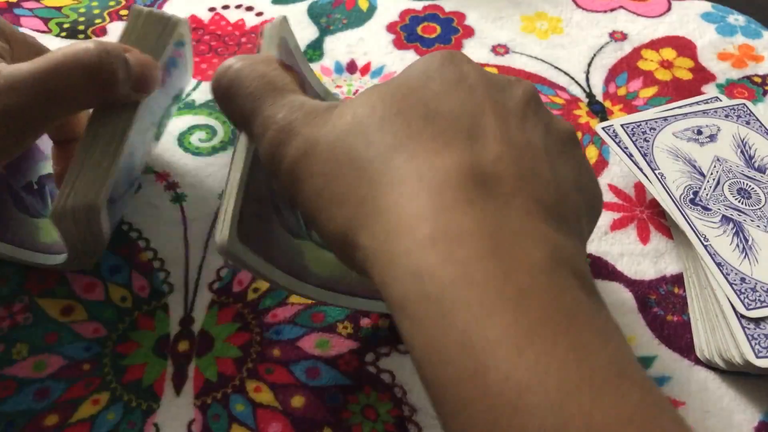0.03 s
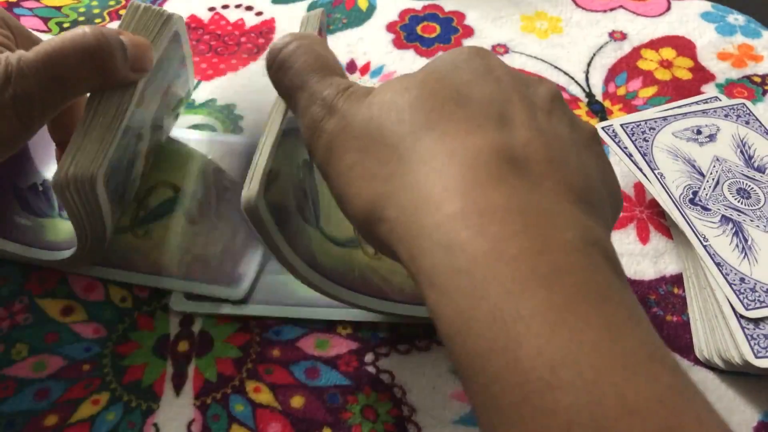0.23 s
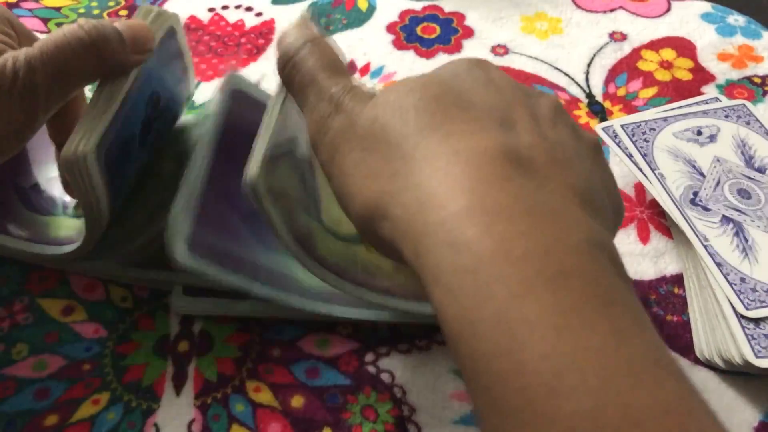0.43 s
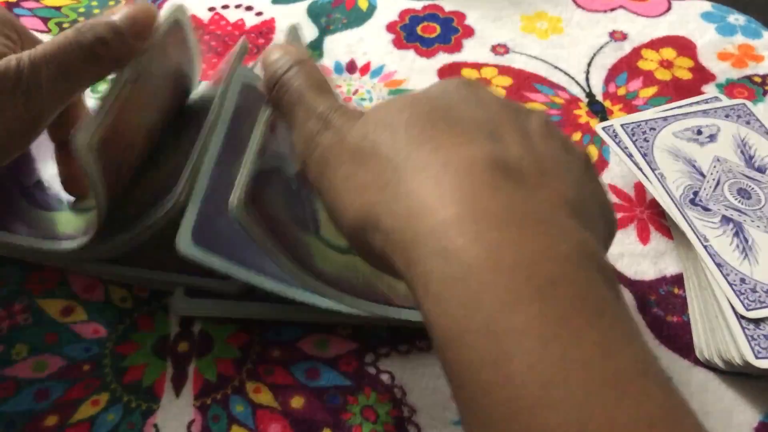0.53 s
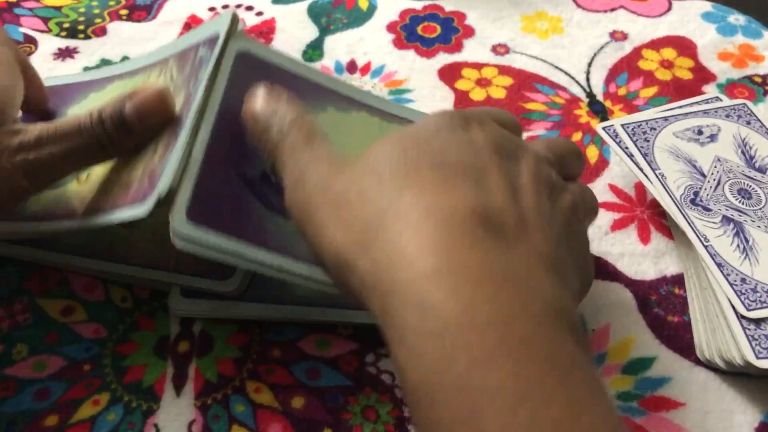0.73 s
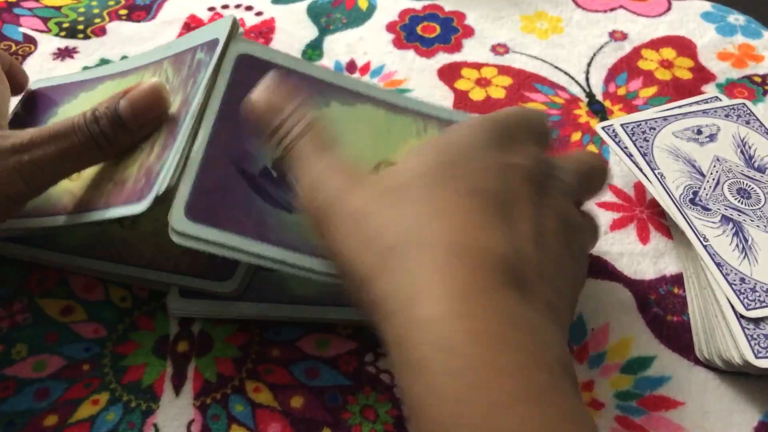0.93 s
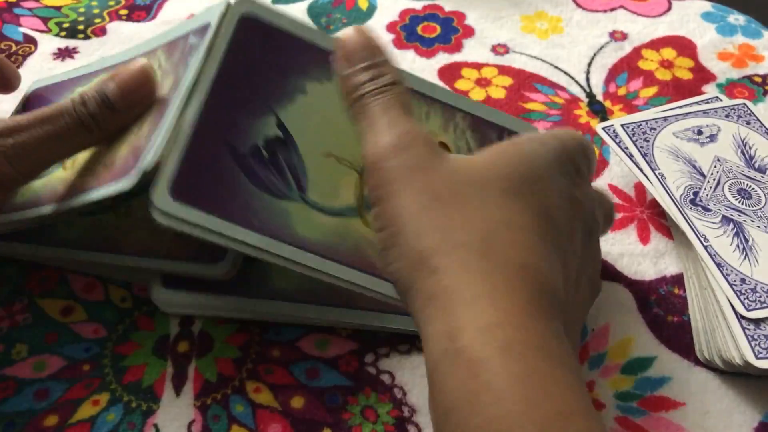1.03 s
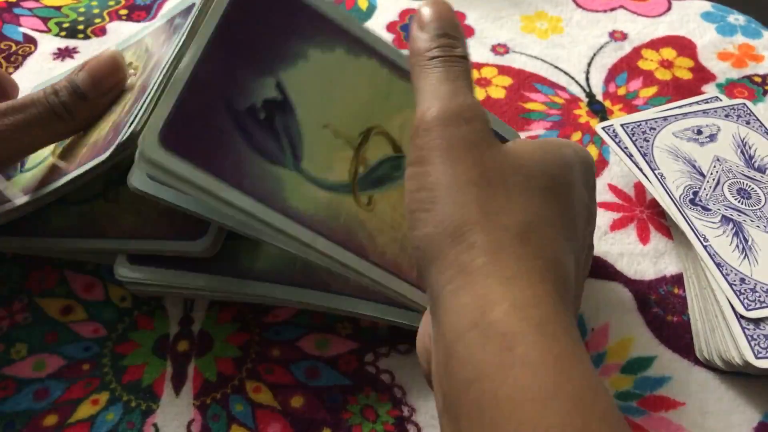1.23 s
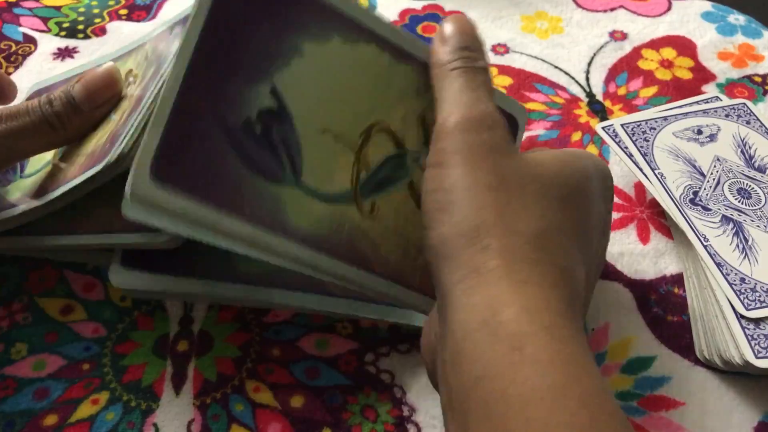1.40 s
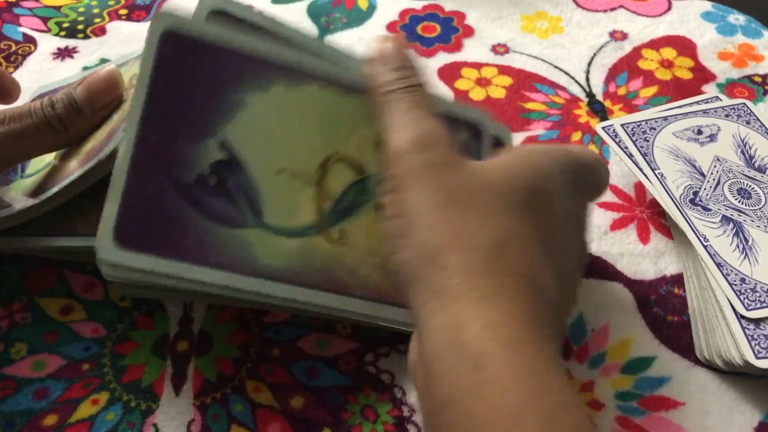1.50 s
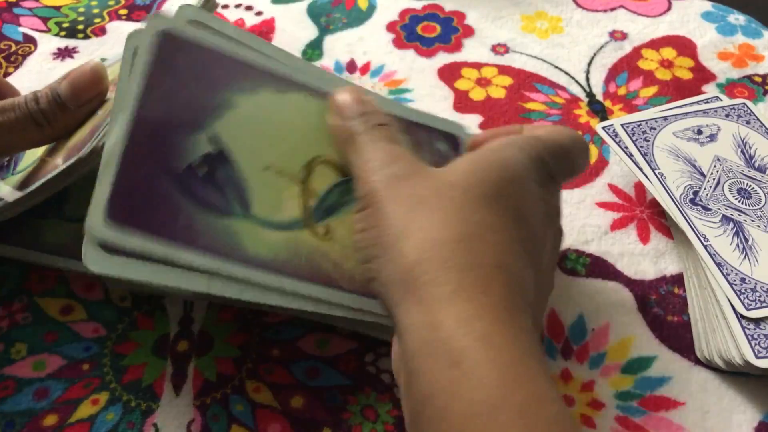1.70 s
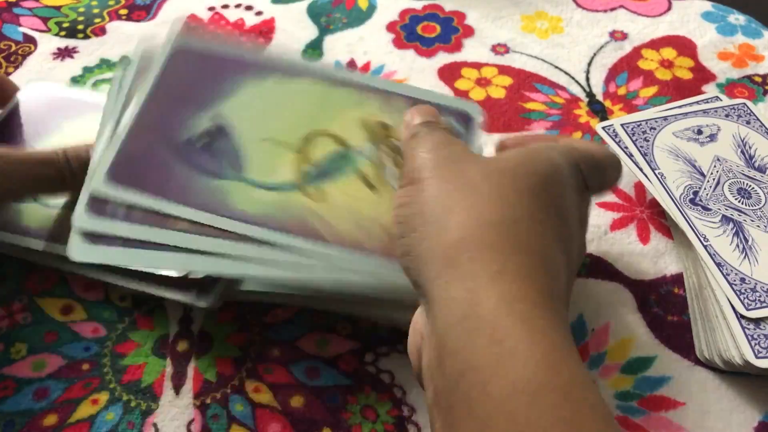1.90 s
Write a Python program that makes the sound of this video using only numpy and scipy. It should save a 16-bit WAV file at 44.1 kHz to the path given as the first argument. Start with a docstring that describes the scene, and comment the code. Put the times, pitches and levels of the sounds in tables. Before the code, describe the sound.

A deck of large, stiff cards is riffled close to the microphone. From about 0.15 to 0.7 seconds, papery flicks crowd together, with hard, bright claps near 0.2, 0.4, 0.54 and 0.63 and soft thuds on cloth. Then faint sliding hiss and tiny knocks around 1.05-1.2, a clearer tap at 1.47, a lighter one at 1.7, and small corner snaps at 1.88-1.94. Small room, low hum.

```python
"""Cards flick and clap through one riffle, then the halves slide together with a soft hiss and light knocks.
The deck is large and stiff, on a cloth-covered table, close to the microphone in a small room with a low hum.
Flicks are noise bursts; claps are chirps of squeezed-out air that set bent cards ringing.
Thumps, knocks and corner snaps are damped modes; rubbing is dense random slips shaped by level and spectrum.
"""
import sys
import numpy as np
from scipy import signal
from scipy.fft import rfft, irfft
from scipy.io import wavfile
from scipy.ndimage import uniform_filter1d

SR = 44100
rng = np.random.default_rng(int(sys.argv[2]) if len(sys.argv) > 2 else 0)


def bounce(signal):
    """Save signal as a 16-bit WAV file at the path given by the first command-line argument."""
    frames = np.transpose(np.atleast_2d(signal))
    limited = np.clip(frames, -1, 1)
    pcm = np.round(limited * 32767).astype(np.int16)
    wavfile.write(sys.argv[1], SR, pcm)


N = 85995

# Room air spectrum. Each row: frequency in Hz, relative level in dB.
AIR_COLOUR = [(25, -14), (45, 1.5), (190, -11.5), (650, -24.5), (1100, -15.5), (2000, -23), (3500, -22.5),
              (7000, -33)]
AIR_DB = -59.5
# Hum tones. Each row: frequency in Hz, rms level in dB.
HUM_TONES = [(134, -66.5), (240, -68.5)]

# Card faces rubbing during the riffle. Each row: time in seconds, level in dB.
RIFFLE_LEVEL = [(.14, -77.5), (.18, -57), (.22, -50.5), (.26, -51), (.32, -61), (.37, -40.5), (.445, -32.5),
                (.49, -48), (.56, -41.5), (.655, -27.5), (.69, -41), (.73, -44.5), (.8, -80)]
# Spectrum of that rubbing. Each row: frequency in Hz, relative level in dB.
RIFFLE_COLOUR = [(40, 4), (130, 7.5), (350, 0.5), (1100, -2.5), (3300, -9), (5500, -12.5), (15000, -21)]
# The halves sliding together. Each row: time in seconds, level in dB.
SLIDE_LEVEL = [(.75, -58.5), (.93, -65.5), (1.035, -55.5), (1.115, -62), (1.16, -54), (1.23, -66),
               (1.425, -102), (1.44, -56), (1.52, -74.5), (1.7, -75), (1.82, -64), (1.92, -80), (1.95, -60)]
# Spectrum of the slide. Each row: frequency in Hz, relative level in dB.
SLIDE_COLOUR = [(450, -8.5), (1100, -3.5), (3400, -6.5), (5000, -10), (10500, -14), (15000, -17.5)]
SLIPS_PER_S, RIFFLE_SPREAD_DB, SLIDE_SPREAD_DB = 7000, 2.6, 2.3

# Single cards flicking free and patting the pile; the row at 1.437 s is a brief scrape as the halves slide.
# Each row: start in seconds, thud level in dB, crack level in dB, edge tick level in dB.
FLICKS = [(0.1453,-40,-47.5,-51.5), (.166,-42,-53,-45), (0.172,-33.5,-38,-43.5), (0.1827,-35.5,-36,-38),
          (.188,-23.5,-31.5,-33.5), (0.2044,-20,-16,-33), (.234,-30,-37.5,-45), (.264,-44,-39.5,-34),
          (0.271,-38.5,-31.5,-41), (0.2798,-22.5,-34.5,-36.5), (.2879,-29,-32.5,-35),
          (0.3337,-36,-45.5,-47.5), (0.3586,-32.5,-41,-37.5), (0.3697,-30,-32.5,-36.5),
          (.3956,-27,-34.5,-41), (0.405,-38.5,-28,-36.5), (0.4133,-34.5,-13,-31), (.429,-34,-21,-38),
          (0.4517,-27.5,-30,-30.5), (0.506,-36,-40.5,-34.5), (.522,-22,-19,-36), (0.5328,-34.5,-21.5,-33.5),
          (0.5368,-23.5,-15,-38.5), (0.5467,-23,-18,-37.5), (0.571,-27,-26.5,-32.5), (0.5793,-24,-20,-32.5),
          (.588,-27,-24.5,-35), (0.5984,-36,-27,-35.5), (0.6211,-39.5,-19.5,-26.5), (.6239,-17.5,-13.5,-26),
          (0.6257,-31,-17.5,-26.5), (0.6465,-21,-22,-27), (.655,-27,-25,-29), (.662,-36,-19,-28),
          (.672,-42,-29.5,-31.5), (0.6813,-32,-36,-35.5), (1.437,-76,-50.5,-68), (1.696,-40.5,-62,-66)]
# Thud, crack and edge tick. Each row: low edge in Hz, high edge in Hz, decay time constant in seconds.
FLICK_PARTS = [(110, 895, 0.0049), (869, 3760, 0.0024), (4350, 13700, 0.00095)]
FLICK_RISE_S = 0.00023

# Packets landing on the cloth. Each row: start in seconds, level in dB.
THUMPS = [(0.202, -28), (0.281, -29), (0.546, -34), (0.658, -33.5), (1.145, -51.5)]
# Modes of the padded table. Each row: frequency in Hz, relative level in dB, t60 in seconds.
TABLE_MODES = [(63, 0, .1), (141, -.5, .13)]

# Edges knocking against the stack.
# Each row: start in seconds, ring level in dB, tilt in dB per octave, edge tick level in dB.
KNOCKS = [(0.8703, -50, -4, -54), (1.0443, -40, 10, -51.5), (1.096, -37, 13, -54), (1.168, -41.5, 1, -63),
          (1.1845, -34, 3.5, -48.5), (1.4744, -22.5, 3.5, -40), (1.6927, -35, 3.5, -48)]
# Modes of the stack. Each row: frequency in Hz, relative level in dB before tilt, t60 in seconds.
STACK_MODES = [(910, -2, .017), (1300, -1, .014), (2040, -5, .019), (3200, -1, .0055)]
# Corners of single cards snapping free.
# Each row: start in seconds, ring level in dB, tilt in dB per octave, edge tick level in dB.
SNAPS = [(0.2038, -8, 3.5, -42), (1.745, -41, 5.5, -52.5), (1.8760, -29.5, 5.5, -48),
         (1.8818, -29, 1.5, -41.5), (1.9362, -21, 4.5, -37.5)]
# Modes of one bent card. Each row: frequency in Hz, relative level in dB before tilt, t60 in seconds.
CARD_MODES = [(1450, 0, .015), (2050, -8, .008), (3050, -6, .0045), (4200, 0, .007), (5420, -5, .006)]
KNOCK_RISE_S, KNOCK_SCATTER_DB = .0008, -16

# Clumps clapping shut, most rising in pitch as the air pocket closes; the late row at 0.70 s is a single card
# corner snapping free. Each row: start in seconds, length in seconds, start pitch in Hz, end pitch in Hz, level
# in dB.
CLAPS = [(.2040, .0050, 640, 1000, -11), (.4150, .0037, 1300, 4700, -2.5), (.4169, .0052, 3300, 3320, -6.5),
         (.5342, .0026, 1200, 2400, -3), (.5364, .0020, 2900, 3700, -6.5), (.5400, .0054, 1750, 2450, -10),
         (.6266, .0014, 1600, 4400, -5), (.640, .024, 290, 190, -29), (.7010, .0015, 2700, 4700, -19.5)]
CLAP_GRIT_GAIN, CLAP_PEAK_FRACTION = .15, .6
# Bent cards ringing after a clap. Each row: frequency in Hz, relative level in dB, t60 in seconds.
RING_MODES = [(2540, -20, .22), (3270, -21, .17)]
# Reach: how far from a clap's pitch modes answer. Fade: the thinning deck rings less.
RING_DB, RING_REACH_OCT, RING_FADE_DB_PER_S = 6.5, 0.68, 42

# Room tail. Each row: frequency in Hz, t60 in seconds, level in dB.
ROOM = [(99, 0.3, -16.5), (2400, 0.27, -13.5), (5800, 0.3, -20.5), (13900, 0.23, -13)]
ROOM_DELAY_S = .004

CEILING = .96
BAND_EDGE_HZ = 15900


def amp(db):
    """Decibels to gain."""
    return 10 ** (np.asarray(db) / 20)


def unit(x):
    """Scales to rms 1."""
    return x / np.sqrt(np.mean(x ** 2) + 1e-20)


def add(mix, start_s, sound):
    """Mixes a sound in at start_s, cut at the end of the mix."""
    part = mix[round(start_s * SR):][:len(sound)]
    part += sound[:len(part)]


def read(points, hz):
    """Interpolates a table along log frequency."""
    points_hz, value = np.transpose(points)
    return np.interp(np.log(hz + 1), np.log(points_hz), value)


def sine(hz, t, phase=0):
    """A sine, phase in radians."""
    return np.sin(2 * np.pi * hz * t + phase)


def wander(length, size):
    """Noise smoothed over size samples, at rms 1."""
    return unit(uniform_filter1d(rng.standard_normal(length), size=size))


def coloured(x, colour):
    """Filters x by a spectrum table, to rms 1."""
    gain = amp(read(colour, np.fft.rfftfreq(len(x), 1 / SR)))
    return unit(irfft(rfft(x) * gain, len(x)))


def burst(low_hz, high_hz, decay_s):
    """A dying puff of noise in one band, with the energy of 3 ms at full level."""
    t = np.arange(SR // 8) / SR
    envelope = (1 - np.exp(-t / FLICK_RISE_S)) * np.exp(-t / decay_s)
    band = signal.butter(2, [low_hz, high_hz], "band", fs=SR, output="sos")
    puff = signal.sosfilt(band, rng.standard_normal(len(t)) * envelope)
    return unit(puff) * np.sqrt(.003 / t[-1])


def background():
    """Steady coloured noise for room air, and faint hum tones with wavering phase."""
    t = np.arange(N) / SR
    out = amp(AIR_DB) * coloured(rng.standard_normal(N), AIR_COLOUR)
    for hz, db in HUM_TONES:
        out += amp(db) * unit(sine(hz, t, .5 * wander(N, 6000)))
    return out


def friction(level, colour, spread_db):
    """Rubbing faces: dense tiny slips of uneven size, following a level curve."""
    happens = rng.random(N) < SLIPS_PER_S / SR
    size_db = spread_db * np.minimum(rng.exponential(1, N), 4)
    slips = happens * rng.standard_normal(N) * amp(size_db)
    level_db = np.interp(np.arange(N) / SR, *np.transpose(level), left=-120)
    return coloured(slips, colour) * amp(level_db)


def flicks():
    """Each card ticks past the thumb, cracks straight and pats the pile: three bursts at once."""
    out = np.zeros(N)
    for start_s, *levels_db in FLICKS:
        for db, part in zip(levels_db, FLICK_PARTS):
            add(out, start_s, amp(db) * burst(*part))
    return out


def thumps():
    """Landing packets excite the padded table's damped low modes."""
    out, t = np.zeros(N), np.arange(SR // 4) / SR
    ring = sum(amp(db - 60 * t / t60_s) * sine(hz, t) for hz, db, t60_s in TABLE_MODES)
    for start_s, db in THUMPS:
        add(out, start_s, amp(db) * ring)
    return out


def knocks(events, modes):
    """An edge tick, the damped modes of what is struck and a scatter of loose cards."""
    out, t = np.zeros(N), np.arange(SR // 8) / SR
    rise = 1 - np.exp(-(t / KNOCK_RISE_S) ** 2)
    for start_s, db, tilt_db_per_oct, tick_db in events:
        ring = np.zeros(len(t))
        for k, (hz, mode_db, t60_s) in enumerate(modes):
            tilted_db = mode_db + tilt_db_per_oct * np.log2(hz / 2000)
            ring += (-1) ** k * amp(tilted_db - 60 * t / t60_s) * sine(hz, t)  # alternating polarity
        scatter = amp(KNOCK_SCATTER_DB) * burst(450, 4500, 0.0026)
        tick = amp(tick_db) * burst(*FLICK_PARTS[2])
        add(out, start_s, amp(db) * (ring * rise + scatter) + tick)
    return out


def air_chirp(length_s, start_hz, end_hz):
    """Air squeezed from a closing pocket: a swelling pitch glide with some grit."""
    u = np.arange(0, 1, 1 / (length_s * SR))
    swell = np.interp(u, [0, CLAP_PEAK_FRACTION, 1], [0, 1, 0])
    glide_hz = start_hz * (end_hz / start_hz) ** u
    chirp = np.sin(2 * np.pi * np.cumsum(glide_hz) / SR)
    return swell * (chirp + CLAP_GRIT_GAIN * wander(len(u), 6))


def claps():
    """Chirps of trapped air; each sets the card modes near its pitch ringing."""
    out, t = np.zeros(N), np.arange(SR // 4) / SR
    first_s = CLAPS[0][0]
    for start_s, length_s, start_hz, end_hz, db in CLAPS:
        add(out, start_s, amp(db) * air_chirp(length_s, start_hz, end_hz))
        ring_db = db + RING_DB - RING_FADE_DB_PER_S * (start_s - first_s)
        centre_hz = np.sqrt(start_hz * end_hz)
        for hz, mode_db, t60_s in RING_MODES:
            reach = np.exp(-(np.log2(hz / centre_hz) / RING_REACH_OCT) ** 2)
            ring = sine(hz, t, 2.1 * wander(len(t), 900))
            add(out, start_s + length_s / 2, reach * amp(ring_db + mode_db - 60 * t / t60_s) * ring)
    return out


def room(x):
    """A short diffuse tail: noise with its own decay and level at each frequency."""
    hz, t, noise = signal.stft(rng.standard_normal(SR // 2), SR, nperseg=256)
    table = np.array(ROOM)
    t60_s = read(table[:, [0, 1]], hz)[:, None]
    db = read(table[:, [0, 2]], hz)[:, None]
    energy_scale = np.sqrt(2 * np.log(1000) / (t60_s * SR))  # level independent of t60
    tail = signal.istft(noise * amp(db - 60 * t / t60_s) * energy_scale, SR, nperseg=256)[1]
    out = np.zeros(N)
    add(out, ROOM_DELAY_S, signal.fftconvolve(x, tail))
    return out


def scene():
    """All card sounds with their room tail, over the background."""
    rubbing = friction(RIFFLE_LEVEL, RIFFLE_COLOUR, RIFFLE_SPREAD_DB)
    sliding = friction(SLIDE_LEVEL, SLIDE_COLOUR, SLIDE_SPREAD_DB)
    struck = flicks() + thumps() + knocks(SNAPS, CARD_MODES) + knocks(KNOCKS, STACK_MODES)
    cards = rubbing + sliding + struck + claps()
    return (background() + cards + room(cards))[None]


def record(dry):
    """The microphone's bass cut, overload on the hardest peaks, then the band limit."""
    bass_cut = signal.butter(4, 36, "high", fs=SR, output="sos")
    heard = np.clip(signal.sosfilt(bass_cut, dry), -CEILING, CEILING)
    band_limit = signal.firwin(511, BAND_EDGE_HZ, window=("kaiser", 9), fs=SR)
    return signal.oaconvolve(heard, band_limit[None], "same")


dry = scene()
out = record(dry)
bounce(out)
```